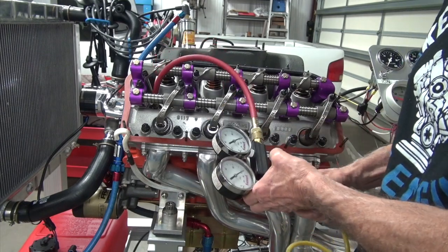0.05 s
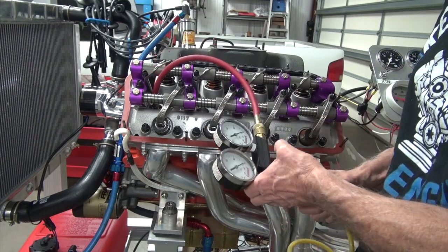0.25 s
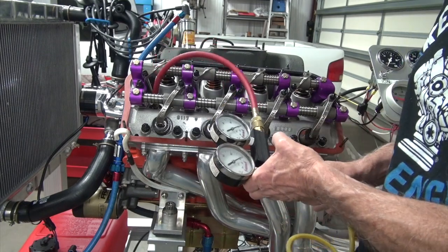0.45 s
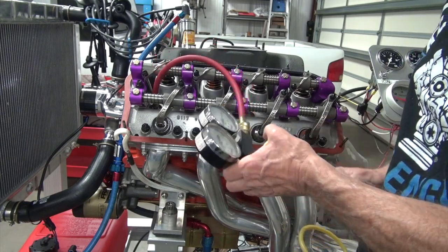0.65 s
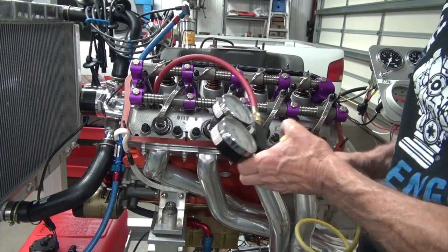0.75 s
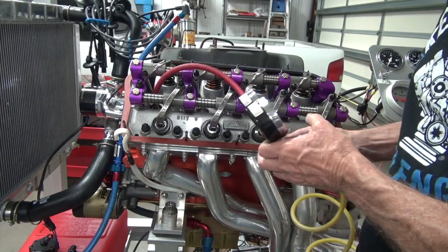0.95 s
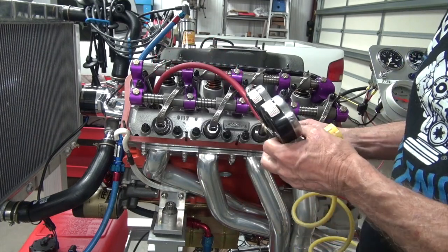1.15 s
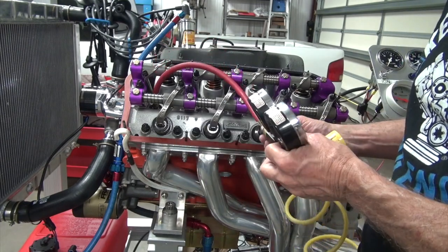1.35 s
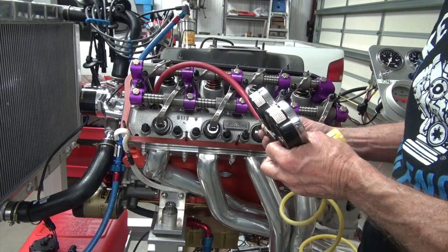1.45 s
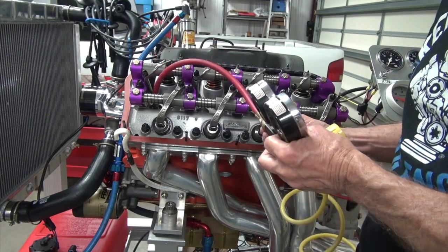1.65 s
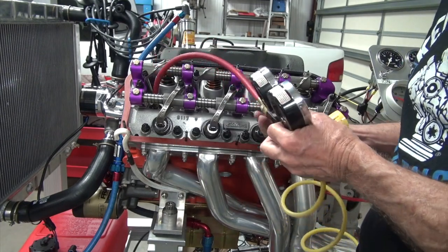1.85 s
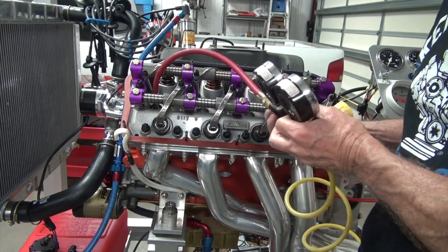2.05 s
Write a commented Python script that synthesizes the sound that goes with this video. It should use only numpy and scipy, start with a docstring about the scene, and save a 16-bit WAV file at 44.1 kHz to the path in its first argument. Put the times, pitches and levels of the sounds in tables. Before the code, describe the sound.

Compressed air hisses faintly, then a hose coupler pops off and air gushes out, fading

```python
"""A workshop in stereo: a distant machine hums in wavering tones over a soft floor of noise, while
compressed air leaks through an engine cylinder, a steady hiss coloured by the passages it whistles in.
After half a second a quick coupler is pulled: short pressure pulses pop, the hose's air column thuds
and a wide gush of noise blasts out. The trapped air then hisses through the open fitting, whose short
bore and hose ring in the jet, and dies as the pressure falls. The room reflects all but the machine."""
import sys
import numpy as np
from scipy import signal
from scipy.io import wavfile
from scipy.ndimage import uniform_filter1d

SR = 44100
rng = np.random.default_rng(int(sys.argv[2]) if len(sys.argv) > 2 else 0)


def decibels_to_gain(level_db):
    """Convert a level in decibels to a linear amplitude gain (20 dB per decade)."""
    exponent = np.asarray(level_db, float) / 20
    return 10 ** exponent


def dump(signal):
    """Clip the signal to [-1, 1] and save it as 16-bit WAV at the path in sys.argv[1]."""
    limited = np.clip(np.atleast_2d(signal).T, -1, 1)
    pcm = np.round(limited * 32767).astype(np.int16)
    wavfile.write(sys.argv[1], SR, pcm)


N = 92610  # 2.1 s

FRAME, HOP = 1024, 256  # samples in each frame of noise, and from one frame to the next
HZ = np.fft.rfftfreq(FRAME, 1 / SR)
T = np.arange(N // HOP + 5) * HOP / SR  # frame times in seconds

# Noise levels ending in _DB are relative totals: air() scales all the noises alike.
# Stereo image tables hold two lists. Each row of the first: frequency in Hz, left over right in dB.
# Each row of the second: frequency in Hz, likeness of the two channels (1 = the same).

# Hum lines of the distant machine. Each row: frequency in Hz, mean level in dB rms.
HUM_LINES = [(59.2, -55.5), (72, -53.5), (118.4, -60), (145, -56), (178, -60)]
# Noise floor of the workshop. Each row: frequency in Hz, relative level in dB per Hz.
FLOOR_SPECTRUM = [(35, -33), (60, -1), (150, -8.5), (230, -16.5), (400, -19.5), (1000, -26), (4000, -31),
                  (12000, -27), (15600, -27)]
FLOOR_DB = -46
# Stereo image of the floor, two lists as above.
FLOOR_IMAGE = [(100, 0)], [(200, 1), (1000, 0.49), (4000, 0.16), (12000, 0.91)]

# Broad hiss of the leak. Each row: frequency in Hz, relative level in dB per Hz.
LEAK_SPECTRUM = [(500, -24), (1300, -9.5), (2000, -1.5), (5500, -8), (8500, -10.5), (12800, -13),
                 (15600, -24)]
LEAK_DB = -34.5
# Passages the leak whistles in. Each row: frequency in Hz, width in Hz, relative level in dB.
LEAK_PASSAGES = [(1660, 220, -42), (2170, 260, -39), (2980, 410, -41.5), (3820, 680, -43), (5030, 560, -34),
                 (5550, 440, -33.5), (6680, 780, -36.5)]
# Stereo image of the leak, two lists as above.
LEAK_IMAGE = [(300, 2), (1300, 3), (3300, 4), (5500, 0.5), (11000, 0.5)], [(300, 0.86), (2000, 0.87),
              (5000, .99), (7500, 0.98), (9000, 0.78), (11000, .999)]
RELEASE_S, LEAK_T60_S = 0.5685, 0.23

# Pulses as the coupler lets go. Each row: start in seconds, peak in dB ahead of the microphone's
# low cut, frequency in Hz, length in cycles.
COUPLER_POPS = [(0.5653, -3.5, 3600, 1.05), (0.5695, -14, 800, 0.39), (0.5714, -10, 840, 0.72),
                (0.5743, -5, 570, 0.5)]
MIC_LOW_CUT_HZ = 117
# Hose air column after the pop. Each row: frequency in Hz, level before decay and fade-in in dB,
# t60 in seconds.
THUD_MODES = [(279, -35.5, 0.12), (379, -18, 0.058), (1048, -19.5, 0.052), (1531, -23, 0.32)]
THUD_S, THUD_RISE_S = 0.5700, 0.0021

# First gush. Each row: frequency in Hz, relative level in dB per Hz.
BLAST_SPECTRUM = [(100, -20.5), (300, 4.5), (650, -8), (1400, 1), (2200, -9.5), (3000, -2), (5000, 0.5),
                  (8000, -1), (9000, -10), (12000, -10.5), (15600, -27)]
BLAST_DB, BLAST_RISE_S, BLAST_HOLD_S = -10.5, 0.0049, 0.035
# Decay of the gush. Each row: frequency in Hz, t60 in seconds.
BLAST_DECAY = [(150, 0.2), (500, 0.14), (1500, 0.32), (4000, 0.52), (13000, 0.42)]
# Stereo image of the gush, two lists as above.
BLAST_IMAGE = [(200, 2.5), (1500, 3.5), (5000, -0.5)], [(500, 0.96), (1500, 0.37), (5500, 1), (9500, 0.78),
               (12000, 0.99)]
SEEP_S, SEEP_DB = 0.012, -8.5  # seep past the seal: its lead, and its level against the full blast

# Narrow whistle of the fitting. Each row: time in seconds, frequency in Hz, relative level in dB.
WHISTLE_PATH = [(.7, 3530, -33.5), (1.02, 3480, -38), (1.1, 3720, -45), (1.65, 3710, -44.5),
                (1.83, 3684, -42), (1.95, 3720, -54), (2.1, 3640, -68)]
WHISTLE_WIDTH_HZ = 150
# Outflow. Each row: time in seconds, level in dB, ringing of the hose in dB, dullness in dB per octave
# below the jet's peak, swell of the main band in dB.
OUTFLOW = [(.6, -18, -12, -15, -2), (.7, -22.5, 1, -1.5, -1.5), (.8, -24, -4.5, -0.5, 0),
           (1., -25.5, -1.5, -1.06, 6), (1.15, -27.5, 3.5, -1, -3.5), (1.3, -33, 4.5, 0.5, 1.1),
           (1.48, -32.5, 5.5, -0.6, -2), (1.6, -37.5, 1.5, 0.04, 1), (1.83, -43, 5.5, 1, -1),
           (1.92, -46.5, -1.5, 1.2, 1.5), (2.1, -55, 5.5, 1.5, -1)]
# Share of the outflow's dB that each band follows. Each row: frequency in Hz, share.
FLOW_SHARE = [(500, 0.57), (1050, 1.03), (1500, 0.53), (2300, 0.76), (3900, 0.82), (6000, 1.13)]
FULL_FLOW_DB = -23.5  # the outflow level from which the shares count
# Broad jet. Each row: frequency in Hz, relative level in dB per Hz.
JET_SPECTRUM = [(200, -25), (600, -1), (1500, -1), (3000, -4), (6000, -5.5), (10000, -8), (12300, -7),
                (14000, -62)]
JET_DB, JET_PEAK_HZ = -7, 4780
# Resonances of the short bore. Each row: frequency in Hz, width in Hz, relative level in dB.
BORE_MODES = [(1026, 520, -13.5), (1675, 85, -20), (3840, 530, -11.5), (4987, 330, -8), (5670, 670, -3),
              (7070, 480, -7.5), (7785, 420, -3), (9005, 380, -8.5), (10860, 520, -14), (11490, 340, -12)]
# Resonances of the hose. Each row: frequency in Hz, width in Hz, relative level in dB.
HOSE_MODES = [(1533, 240, -14), (5347, 35, -5.5), (5555, 20, -7), (6007, 37, -7.5), (7330, 34, -6),
              (4170, 43, -30)]
# Stereo image of the jet, two lists as above.
VENT_IMAGE = [(5000, 0.4), (8000, -1.3), (12000, -1.4)], [(1500, 1), (4500, 0.97), (6300, .97), (7300, 0.8),
              (10800, 0.6), (11800, .999)]
MAIN_BAND_HZ, MAIN_WIDTH_HZ, VENT_RISE_S = 5570, 1150, 0.09

ROOM_DB, ROOM_T60_S = -8, 0.46  # reflections against the direct sound


def evened(x):
    """Scales to rms 1."""
    return x / np.sqrt(np.mean(x ** 2) + 1e-20)


def read(points, hz=HZ):
    """Joins points on a log-frequency axis."""
    f, value = np.transpose(points)
    return np.interp(np.log(hz + 1), np.log(f + 1), value)


def smooth_power(points, db):
    """Power per bin of a smooth spectrum with relative total level db."""
    p = decibels_to_gain(read(points)) ** 2
    return p / p.sum() * decibels_to_gain(db) ** 2


def ringing_power(modes, order):
    """Power per bin of noise in resonances, each with its own relative total level."""
    total = 0
    for hz, width, db in modes:
        p = (1 + (2 * (HZ - hz) / width) ** 2) ** -float(order)
        total = total + p / p.sum() * decibels_to_gain(db) ** 2
    return total


def air(power, image, patchy_db, gust_db):
    """Stereo turbulence: noise from power per bin and frame, with drifting patches and shared gusts."""
    a, b, c, d, patches = rng.standard_normal((len(T), len(HZ), 5)).T
    patches = uniform_filter1d(patches, size=10, axis=0)
    patches = evened(uniform_filter1d(patches, size=8, axis=1))
    gusts = evened(uniform_filter1d(rng.standard_normal(len(T)), size=3))
    balance_db = read(image[0])
    same = np.clip(read(image[1]), 0, 1)[:, None]
    left = a + 1j * b
    right = same * left + np.sqrt(1 - same ** 2) * (c + 1j * d)
    z = np.array([left, right])
    z = z * decibels_to_gain(np.array([.5, -.5])[:, None] * balance_db)[:, :, None]
    z = z * np.sqrt(power) * decibels_to_gain(patchy_db * patches + gust_db * gusts)
    return .82 * signal.istft(z, nperseg=FRAME, noverlap=FRAME - HOP)[1][:, :N]


def shop():
    """Distant machine: sines wavering slowly in level and phase, over a soft floor of noise."""
    t = np.arange(N) / SR
    hum = 0
    for hz, db in HUM_LINES:
        draws = rng.random((6, 3))
        # six slow sines of 0.5 to 3.5 Hz, together near rms 1
        waver = sum(np.sin(2 * np.pi * ((.5 + 3 * rate) * t + start)) for rate, start, _ in draws)
        waver = waver / np.sqrt(3)
        phase = 2 * np.pi * (hz * t + draws[0, 2]) + 0.9 * waver[::-1]
        hum = hum + np.sqrt(2) * decibels_to_gain(db + 1.3 * waver) * np.sin(phase)
    floor = smooth_power(FLOOR_SPECTRUM, FLOOR_DB)[:, None]
    return hum + air(floor, FLOOR_IMAGE, patchy_db=1.47, gust_db=1.5)


def room(x):
    """Direct sound plus the workshop's decaying reflections, nearly alike in both channels."""
    t = np.arange(SR // 2) / SR
    taps = rng.standard_normal((2, len(t))) * decibels_to_gain(-60 * t / ROOM_T60_S) * (t > .004)
    taps[1] = taps[0] + 0.027 * taps[1]
    taps = taps / np.linalg.norm(taps, axis=1)[:, None]
    return x + decibels_to_gain(ROOM_DB) * signal.fftconvolve(x, taps, axes=1)[:, :N]


def leak():
    """Steady turbulent hiss that dies away once the supply is pulled off."""
    power = smooth_power(LEAK_SPECTRUM, LEAK_DB) + ringing_power(LEAK_PASSAGES, order=2)
    late = np.maximum(np.arange(N) / SR - RELEASE_S, 0)
    hiss = air(power[:, None], LEAK_IMAGE, patchy_db=0.64, gust_db=1.0)
    return hiss * decibels_to_gain(-60 * late / LEAK_T60_S)


def pops():
    """Short pressure pulses of the coupler: soft-edged sines through the microphone's low cut."""
    t, pulses = np.arange(N) / SR, np.zeros(N)
    for s, db, hz, cycles in COUPLER_POPS:
        u = np.maximum(t - s, 0) * hz  # cycles since the start
        edge = 3 * u / cycles * np.exp(1 - 3 * u / cycles)  # tops out at a third of the length
        pulses -= decibels_to_gain(db) * np.sin(2 * np.pi * u) * edge
    low_cut = signal.butter(4, MIC_LOW_CUT_HZ, "high", fs=SR, output="sos")
    return signal.sosfilt(low_cut, pulses)


def thud():
    """The hose's air column rings in its low modes, as decaying sines with a quick fade-in."""
    t = np.maximum(np.arange(N) / SR - THUD_S, 0)
    ring = sum(decibels_to_gain(db - 60 * t / t60) * np.sin(2 * np.pi * hz * t) for hz, db, t60 in THUD_MODES)
    return ring * np.minimum(t / THUD_RISE_S, 1)


def opening(rise_s):
    """Air seeps past the seal just before it lets go, then the flow rises quickly to full."""
    t = np.arange(N) / SR - RELEASE_S
    seep = decibels_to_gain(SEEP_DB) * np.clip(1 + t / SEEP_S, 0, 1)
    return seep + (1 - decibels_to_gain(SEEP_DB)) * np.clip(t / rise_s, 0, 1) ** 2


def blast():
    """The first wide gush: turbulent noise held briefly, then decaying, the low bands soonest."""
    late = np.maximum(T - RELEASE_S - BLAST_HOLD_S, 0)
    decay = decibels_to_gain(-120 * late / read(BLAST_DECAY)[:, None])  # of power, hence 120
    power = smooth_power(BLAST_SPECTRUM, BLAST_DB)[:, None] * decay
    return air(power, BLAST_IMAGE, patchy_db=2.0, gust_db=1.0) * opening(BLAST_RISE_S)


def whistle_power():
    """Power per bin and frame of one narrow resonance that wanders in pitch as it fades."""
    s, hz, db = np.transpose(WHISTLE_PATH)
    offset = HZ[:, None] - np.interp(T, s, hz)
    p = (1 + (2 * offset / WHISTLE_WIDTH_HZ) ** 2) ** -2.
    return p / p.sum(0) * decibels_to_gain(2 * np.interp(T, s, db))


def vent():
    """Jet through the open fitting, ringing bore and hose; pressure falls and bands fade unequally."""
    s, *columns = np.transpose(OUTFLOW)
    flow_db, ring_db, dull_db, swell_db = [np.interp(T, s, column) for column in columns]
    level_db = FULL_FLOW_DB + read(FLOW_SHARE)[:, None] * (flow_db - FULL_FLOW_DB)
    octaves_below = np.log2(JET_PEAK_HZ / np.clip(HZ, 500, JET_PEAK_HZ))
    level_db = level_db + octaves_below[:, None] * dull_db
    main_band = 1 / (1 + (2 * (HZ - MAIN_BAND_HZ) / MAIN_WIDTH_HZ) ** 4)
    level_db = level_db + main_band[:, None] * swell_db
    colour = (smooth_power(JET_SPECTRUM, JET_DB) + ringing_power(BORE_MODES, order=2))[:, None]
    colour = colour + ringing_power(HOSE_MODES, order=1)[:, None] * decibels_to_gain(2 * ring_db)
    power = colour * decibels_to_gain(2 * level_db) + whistle_power()
    fade_in = np.clip((np.arange(N) / SR - RELEASE_S) / VENT_RISE_S, 0, 1)
    return air(power, VENT_IMAGE, patchy_db=1.46, gust_db=0.34) * fade_in


def scene():
    """All sources at the microphone: the air sounds with the room's reflections, the machine without."""
    return room(leak() + pops() + thud() + blast() + vent()) + shop()


def top_cut(x):
    """Nothing passes above the cut-off."""
    return signal.sosfilt(signal.butter(12, 15730, fs=SR, output="sos"), x)


def record(dry):
    """Takes the finished stereo mix down as the delivered file."""
    return top_cut(dry)


dry = scene()
out = record(dry)
dump(out)
```